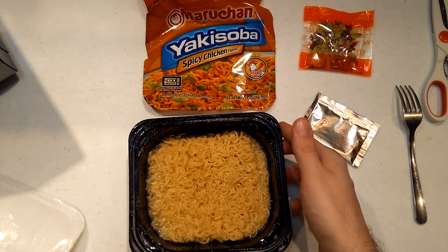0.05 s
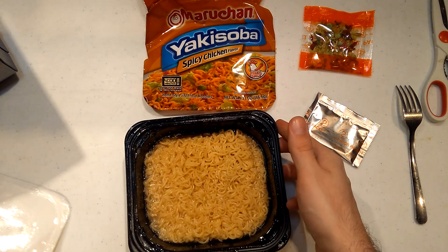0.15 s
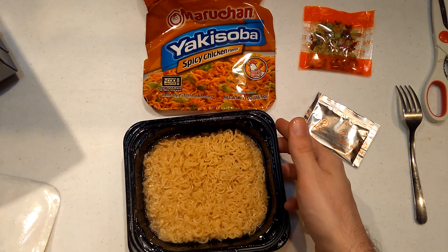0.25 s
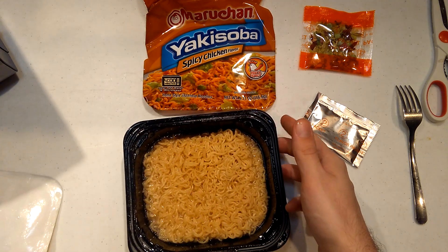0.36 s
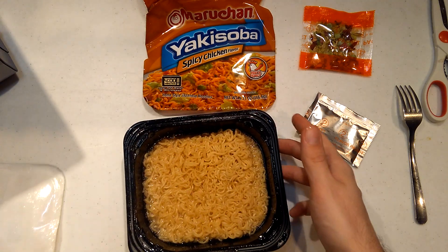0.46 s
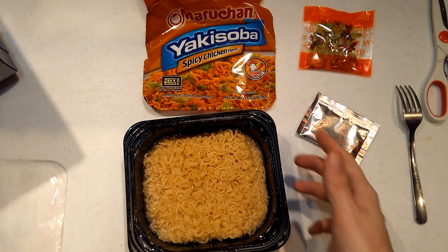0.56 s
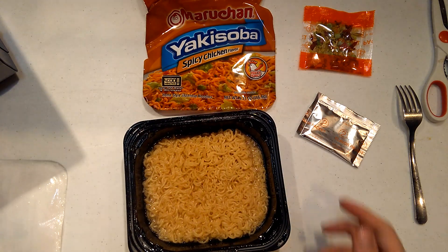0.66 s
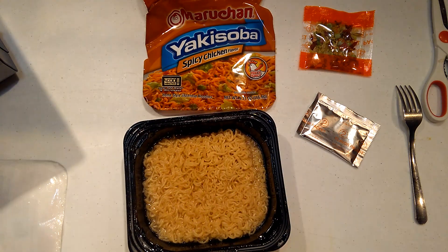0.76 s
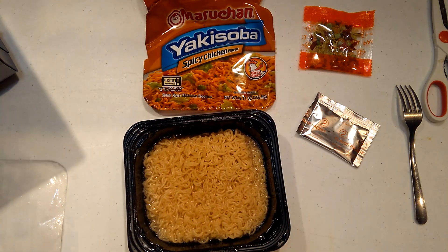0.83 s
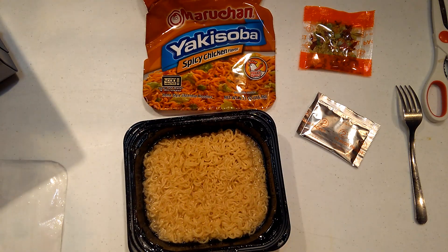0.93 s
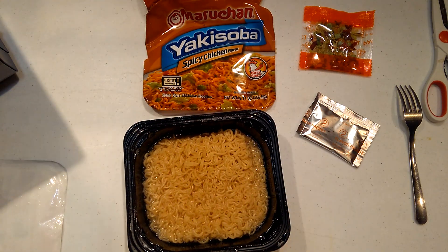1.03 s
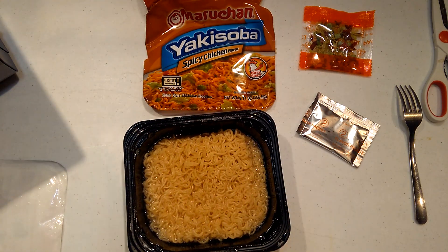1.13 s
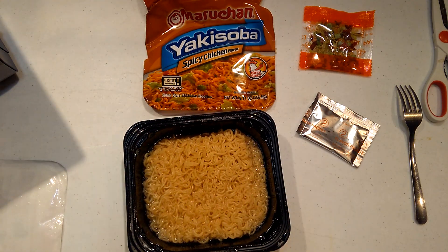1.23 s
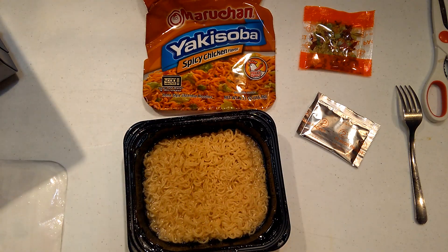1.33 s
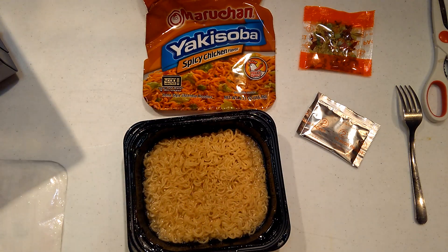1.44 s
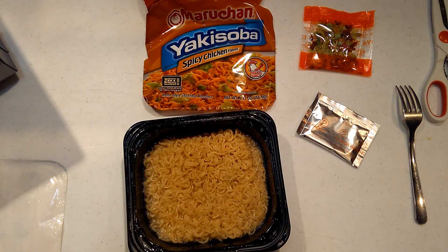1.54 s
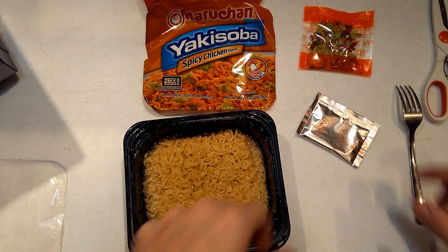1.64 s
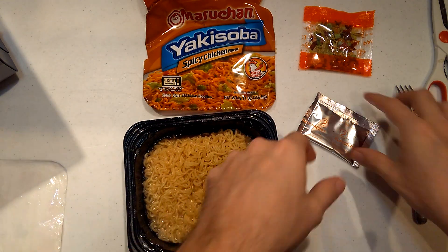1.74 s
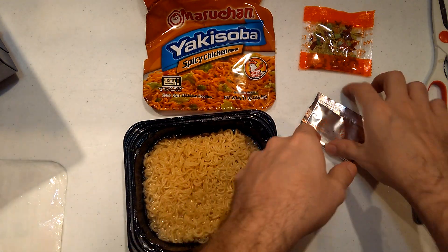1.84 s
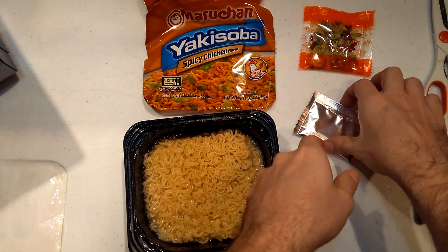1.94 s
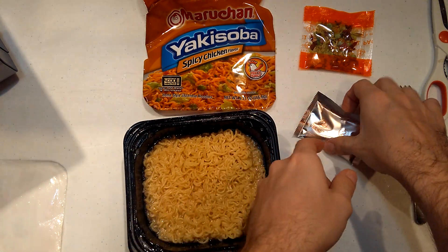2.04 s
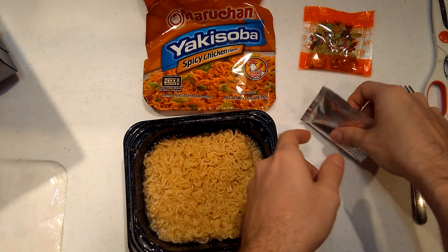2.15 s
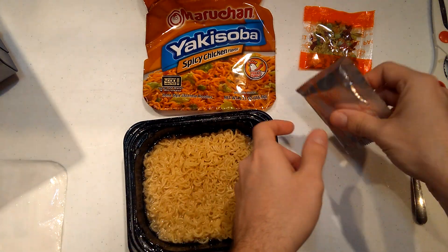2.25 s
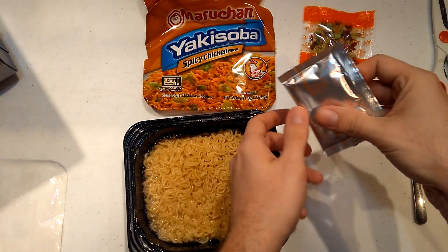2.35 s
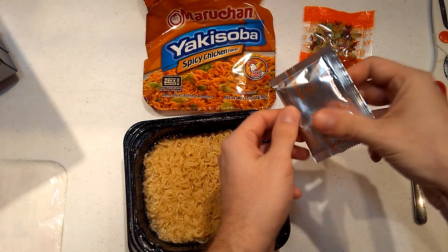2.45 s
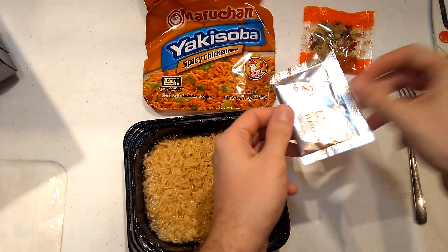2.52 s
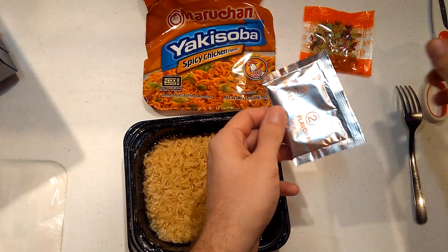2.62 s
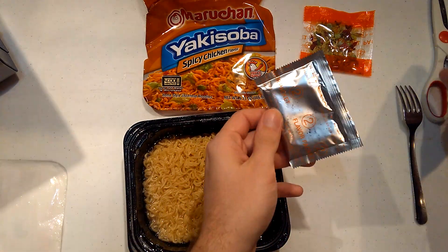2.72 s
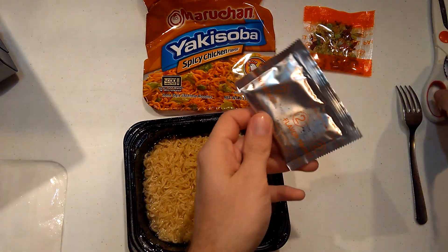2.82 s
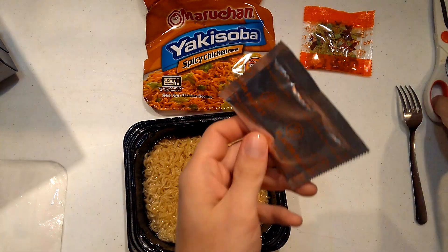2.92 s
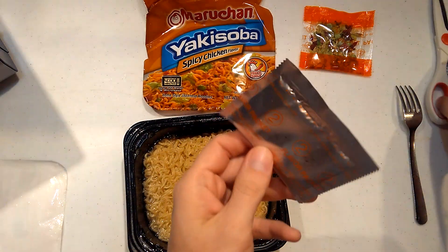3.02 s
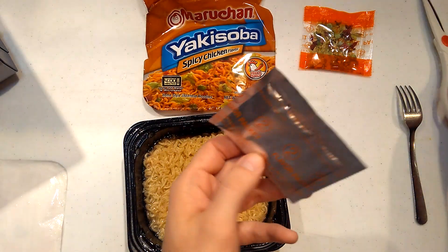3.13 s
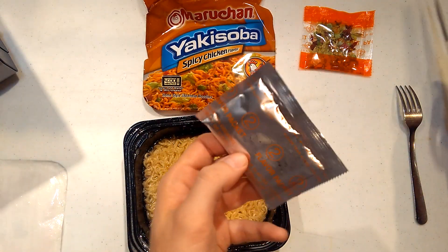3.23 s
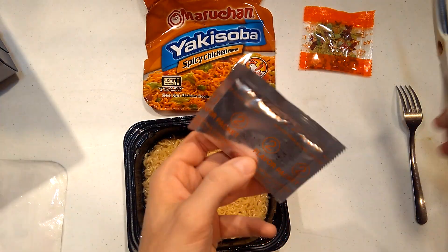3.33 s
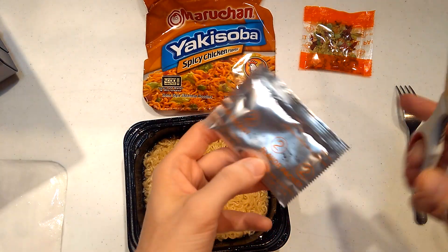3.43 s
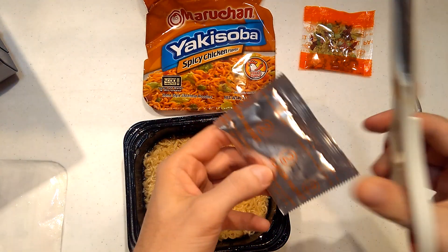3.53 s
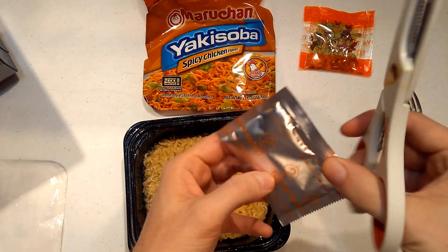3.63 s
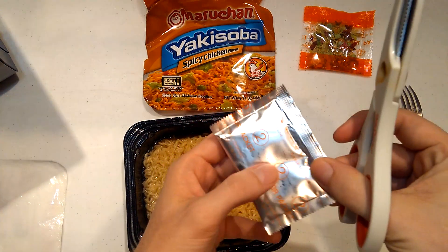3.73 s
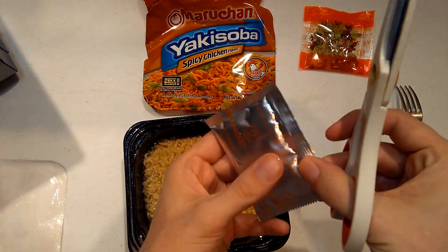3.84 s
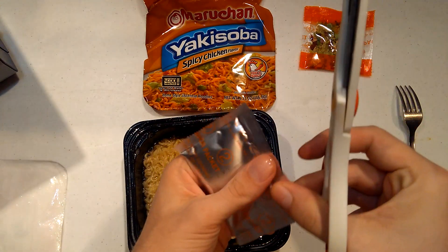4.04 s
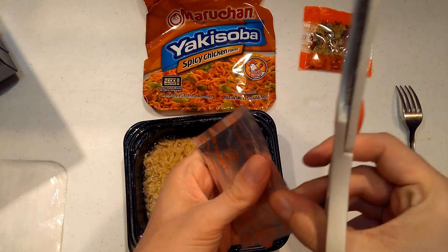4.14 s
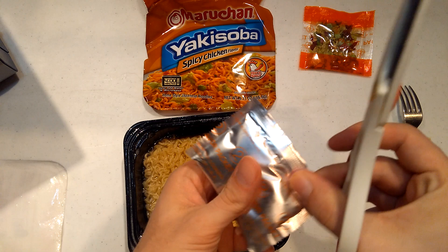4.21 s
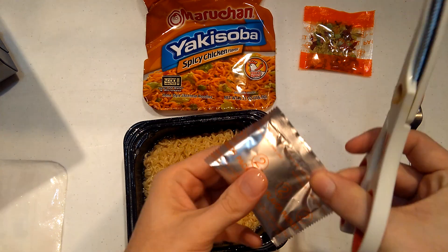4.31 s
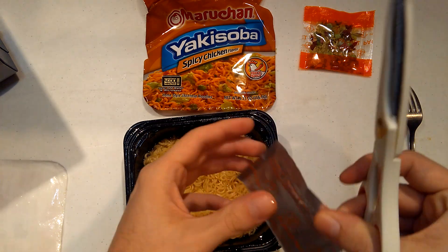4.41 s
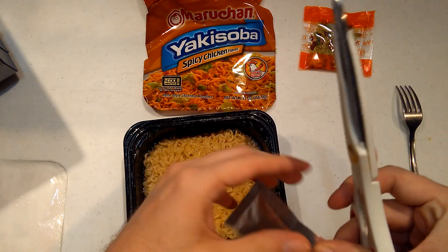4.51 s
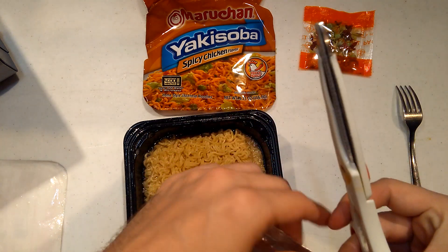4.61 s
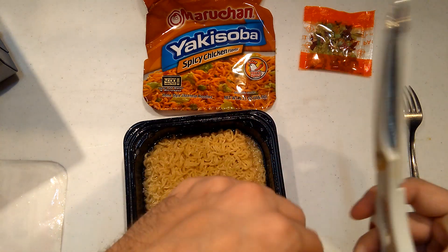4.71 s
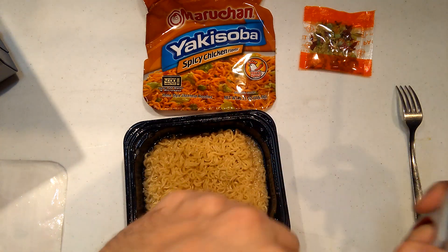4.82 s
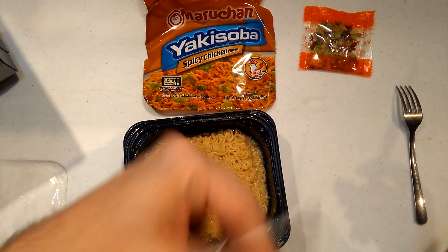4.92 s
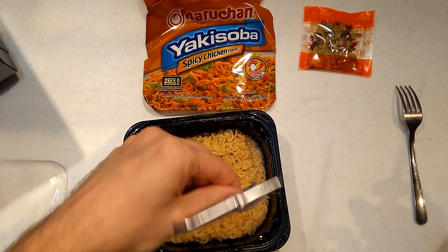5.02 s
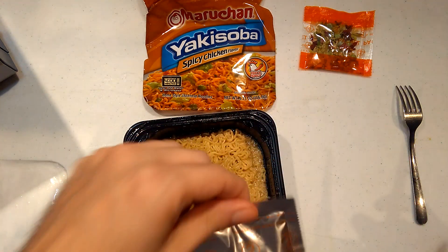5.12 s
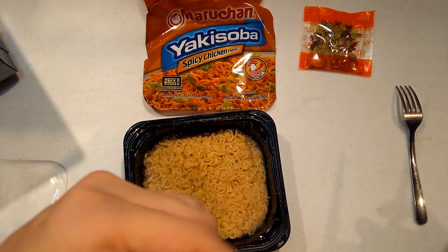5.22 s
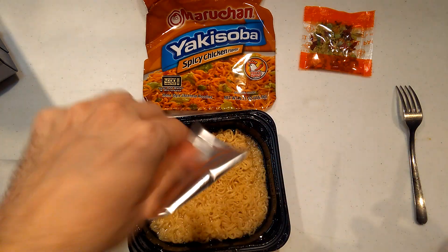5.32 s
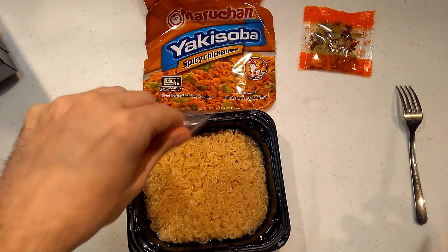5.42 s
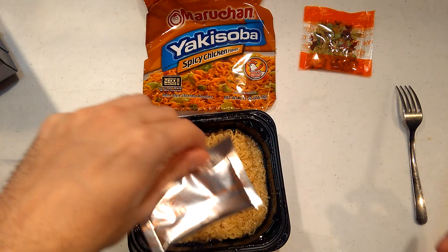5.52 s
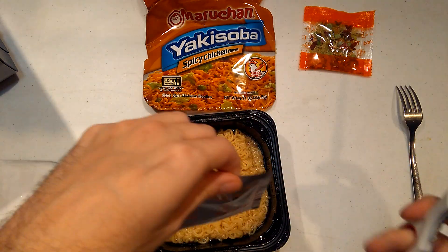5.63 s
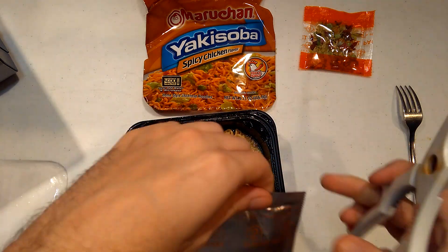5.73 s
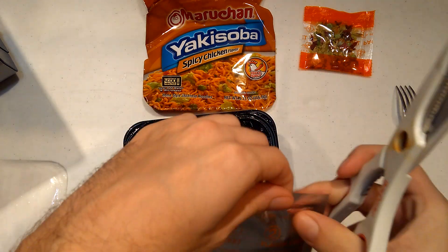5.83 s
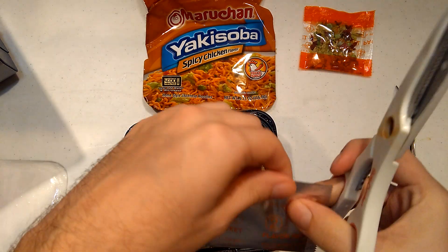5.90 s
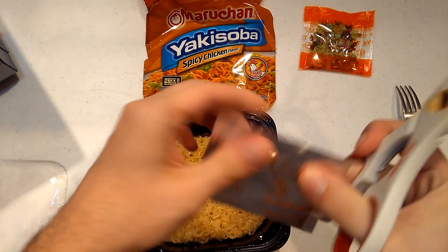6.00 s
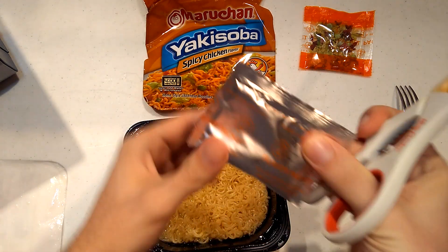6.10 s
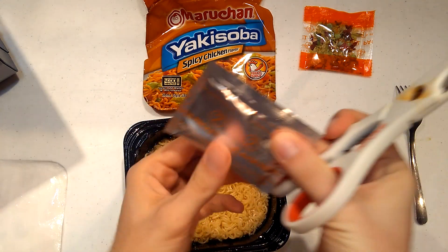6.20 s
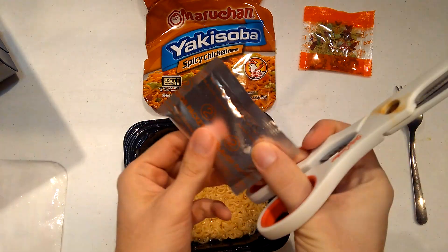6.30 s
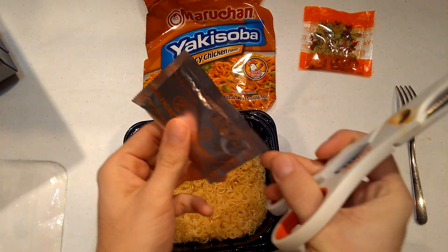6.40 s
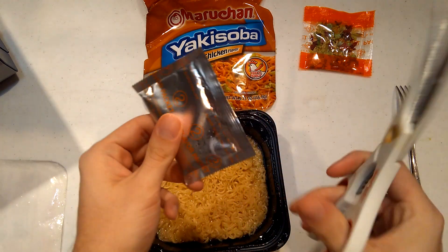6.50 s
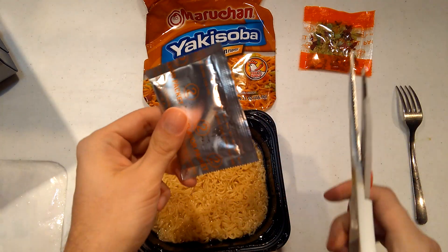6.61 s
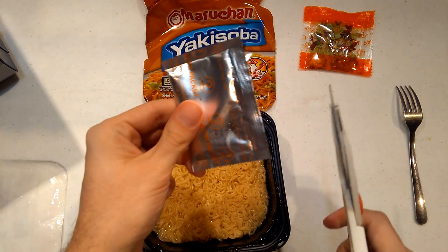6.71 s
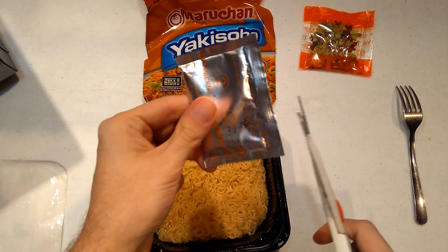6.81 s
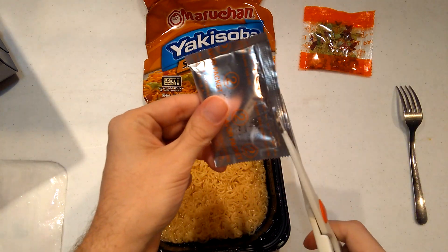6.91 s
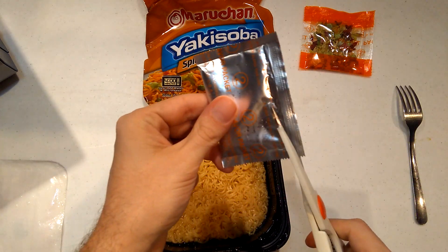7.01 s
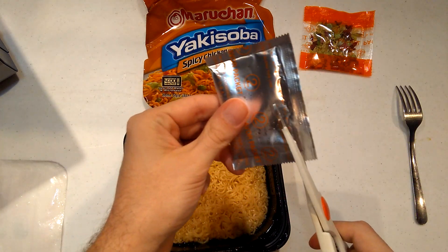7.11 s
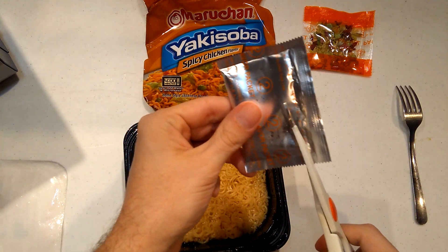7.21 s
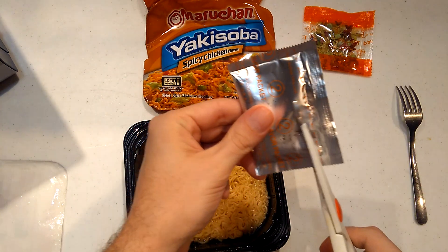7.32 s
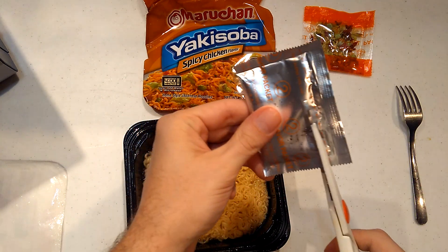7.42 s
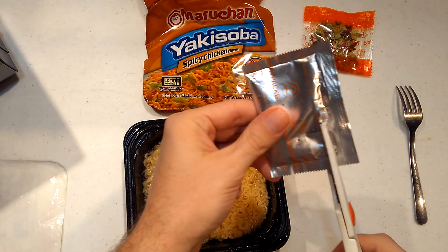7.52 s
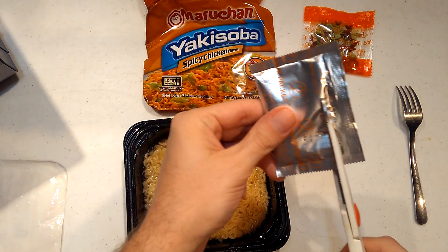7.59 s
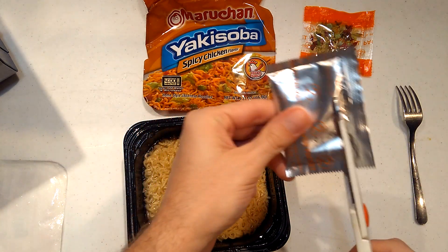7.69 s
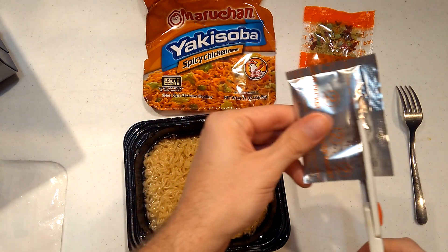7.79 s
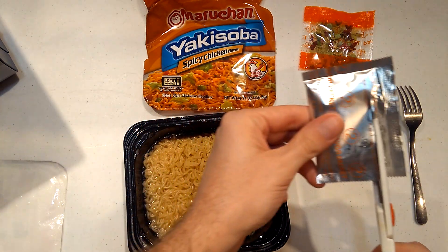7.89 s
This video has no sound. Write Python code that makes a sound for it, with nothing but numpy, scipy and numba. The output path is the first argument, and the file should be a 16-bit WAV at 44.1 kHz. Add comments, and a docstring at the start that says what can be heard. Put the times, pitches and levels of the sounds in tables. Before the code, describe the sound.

In a quiet kitchen, a plastic tray slides briefly on the counter. Knuckles knock and drag across the surface as a small foil sachet is picked up, and a softer knock and scrape follow. The foil crinkles with sharp little snaps, then is shaken several times, the powder slapping inside with soft thumps. Lighter crinkling continues to the end, close to a stereo microphone over a steady low rumble and hiss.

```python
"""At a kitchen counter, hands work a small foil sachet of powder close to a stereo microphone.
Creases snap one by one, squeezes and shakes pour out crackle, and the air in the pouch thumps.
A tray slides briefly at the start, and later knuckles knock and drag on the counter. All of these
are built from rings: short tones that die away. The quiet kitchen rumbles and hisses underneath."""
import sys
import numpy as np
from scipy import signal
from scipy.fft import rfft, irfft
from scipy.io import wavfile
from numba import njit

SR = 44100
rng = np.random.default_rng(int(sys.argv[2]) if len(sys.argv) > 2 else 0)


def inscribe(sig):
    """Save sig as 16-bit PCM at rate SR to the path in sys.argv[1].

    A 1-D sig is mono; a 2-D sig holds one channel per row.
    Samples are clipped to [-1, 1] before scaling.
    """
    pcm = np.round(np.clip(np.atleast_2d(sig).T, -1, 1) * 32767)
    wavfile.write(sys.argv[1], SR, pcm.astype(np.int16))


N = 350595

# Foil creases flipping, and the hollow click of two counter knocks (time [s], level [dB], pitch [Hz])
SHARP_SNAPS = [(0.186, -42.5, 1734), (1.8672, -40, 1302), (1.8775, -28.5, 4020), (1.9162, -41, 1203),
               (1.98, -30.5, 4780), (2.0147, -34, 4680), (2.1051, -30, 4900), (2.1231, -33, 3830),
               (2.1517, -32.5, 4840), (2.161, -44, 5060), (2.1746, -33, 4630), (2.354, -36, 3660),
               (2.494, -41, 4145), (3.596, -43, 1007), (3.6923, -42, 5650), (3.707, -39, 3880),
               (3.7415, -25, 3520), (3.7845, -37, 3700), (3.8183, -36, 1160), (3.85, -39, 1430),
               (3.8671, -27, 1250), (3.9634, -35.5, 2420), (4.0185, -40, 2180), (4.0295, -25, 2190),
               (4.052, -32.5, 2130), (4.078, -36, 4870), (4.1126, -30.5, 2390), (4.1844, -22.5, 7700),
               (4.227, -21.5, 1267), (4.2661, -22, 5090), (4.2856, -34.5, 3770), (4.3163, -31, 4650),
               (4.33, -33, 3580), (4.3597, -32.5, 3630), (4.4114, -31, 5270), (4.659, -29.5, 1853),
               (4.68, -36.5, 3750), (4.729, -38, 1000), (4.746, -35, 3470), (4.8046, -41.5, 4750),
               (4.828, -41, 1800), (4.839, -38, 1510), (4.8529, -20.5, 2230), (4.9032, -33, 3887),
               (4.9182, -17.5, 1500), (4.9255, -18.5, 2080), (4.931, -16, 2200), (5.016, -39, 3580),
               (5.039, -32, 2630), (5.0545, -31, 2210), (5.0767, -26, 2865), (5.0842, -26, 2650),
               (5.096, -26, 4400), (5.123, -26.5, 1570), (5.146, -19, 2020), (5.16, -20.5, 1250),
               (5.178, -34, 2170), (5.2293, -35, 2520), (5.2493, -27.5, 2536), (5.268, -20, 1810),
               (5.273, -14, 2537), (5.281, -20.5, 2724), (5.2997, -18.5, 4220), (5.3149, -28.5, 2270),
               (5.362, -22.5, 1904), (5.383, -25, 2680), (5.3959, -19, 3000), (5.4033, -23, 2137),
               (5.445, -31, 1942), (5.457, -33, 3984), (5.4981, -21.5, 2060), (5.5022, -17, 1350),
               (5.5783, -29, 2835), (5.5891, -32, 1330), (5.6145, -25, 1790), (5.629, -38, 2733),
               (5.752, -34.5, 4634), (5.8737, -41.5, 2540), (5.8824, -31, 4900), (5.899, -37, 5310),
               (5.936, -39.5, 1030), (5.943, -26.5, 1200), (6.018, -46, 1125), (6.2642, -26.5, 4160),
               (6.286, -37.5, 1090), (6.3841, -35.5, 1410), (6.414, -31, 3500), (6.5613, -48, 5390),
               (7.47, -46.5, 1100), (7.5174, -44, 8200), (7.564, -34.5, 1284), (7.569, -34, 1160),
               (7.5998, -39.5, 4400), (7.709, -33, 4190), (7.7395, -33.5, 4440), (7.7614, -29, 4830),
               (7.7746, -35.5, 4130), (7.8243, -27.5, 4100), (7.8747, -30.5, 4700), (7.9014, -27.5, 4810)]
def snaps(count=30):
    """A crease flips or a knock clicks: many very short rings at once, loudest near one pitch."""
    s, db, pitch = np.transpose(SHARP_SNAPS)[:, :, None]
    low_db = -14.5 - 5 * np.log2(pitch / 2400)  # higher snaps have less bass
    spot, flip, delay, side = rng.random((len(s), 4, count)).swapaxes(0, 1)
    hz = 350 * (15500 / 350) ** ((np.arange(count) + spot) / count)
    pitch_db = 14.5 * np.exp(-(np.log(hz / pitch) / .19) ** 2)
    size = undb(db + foil_db(hz, low_db, high_db=-4.5) + pitch_db - 8) * np.sign(flip - .5)
    fade = .003 + 5 / hz + 2000 / hz ** 2
    when = s - .0003 + .0028 * delay ** 3  # most rings start at once, the rest just after
    pan_db = 20 * np.minimum(hz / 3000, 1) * (side - .5)
    return strike(when, hz, fade, size, pan_db, lag_samples=(1, 9))


# Squeezes and shakes (peak time [s], level [dB], rise [s], fall [s], bass [dB], treble [dB])
SQUEEZES = [(.03, -54, 0.11, 0.28, -3.5, -15.5), (.184, -45.5, 0.025, 0.057, -11.5, -29),
            (.422, -55, .04, .05, -27, -20), (.505, -54.5, 0.037, .06, -11, -12),
            (1.214, -46, .006, 0.058, -17, -56), (1.935, -41.5, .03, 0.062, 8, -21),
            (2.015, -48, 0.054, 0.035, -22, -4), (2.124, -46, 0.077, .1, -14.5, -6.5),
            (3.408, -54.5, 0.02, .055, -35, 3), (3.6, -54, 0.013, 0.065, -3.5, -19),
            (3.73, -56.5, 0.14, 0.29, -11, -11), (3.866, -37, 0.0054, 0.029, -23, -25),
            (3.961, -52.5, 0.0045, 0.07, -37, -5), (4.026, -42, 0.014, 0.064, -19, -10),
            (4.18, -40.5, .01, 0.12, -13, -8), (4.27, -51.5, 0.14, .06, -19, 0),
            (4.314, -46, 0.0047, .125, -9, -5), (4.659, -44, 0.011, 0.15, -17, -10),
            (4.858, -40, 0.024, 0.019, -36, -4), (4.923, -21, 0.03, 0.045, -23.5, -8.5),
            (5.16, -32, 0.14, 0.052, -21, -7.5), (5.276, -24.5, 0.032, 0.067, -29, -9.5),
            (5.385, -21.5, 0.04, 0.04, -17, -11.5), (5.506, -28, 0.064, 0.037, -20, -12.5),
            (5.616, -33.5, 0.055, .038, -31, -18.5), (5.75, -42, 0.015, .026, -24, -22),
            (5.88, -48.5, 0.027, 0.063, -11, 0), (5.96, -63, 0.059, .15, -6, -9),
            (6.27, -51, 0.037, 0.04, -8.5, -1), (6.39, -50.5, 0.13, 0.062, -9.5, -10),
            (6.55, -60, 0.13, .06, -17, 4.5), (7.482, -56.5, 0.047, 0.016, -10, -1.5),
            (7.522, -52, 0.0065, .06, -9, 2.5), (7.57, -44.5, 0.045, 0.023, -12, -2.5),
            (7.71, -49.5, 0.045, 0.073, -9.5, -5), (7.762, -52, 0.044, 0.053, -16, -7),
            (7.822, -45.5, 0.024, 0.16, -6.5, -4.5), (7.905, -47, 0.19, .05, -30, -9.5)]
def crackle(count=16000, each=5):
    """Countless tiny creases and powder grains each set off a few rings, mostly faint ones."""
    s = rng.random(count) * N / SR
    db, low_db, high_db = loudest_burst(SQUEEZES, s)[:, :, None]
    spot, strength, flip, delay = rng.random((count, 4, each)).swapaxes(0, 1)
    hz = 280 * (15500 / 280) ** ((np.arange(each) + spot) / each)
    chance_db = 2.07 * rng.exponential(size=(count, 1)) + 10.7 * (strength - .5)
    size = undb(db + foil_db(hz, low_db, high_db) + chance_db - 5.5) * np.sign(flip - .5)
    fade = .003 + 5 / hz + 7000 / hz ** 2  # the air in the pouch booms longer
    heard = db[:, 0] > -150
    when = s[:, None] + .0008 * delay
    # creases lie all over the foil, and the treble beams left or right
    pan_db = 12.6 * np.minimum(hz / 3000, 1) * rng.standard_normal((count, each))
    return strike(*(a[heard] for a in (when, hz, fade, size, pan_db)), lag_samples=(1, 9))


# Powder slaps the pouch, or a finger taps it (time [s], level [dB], pitch [Hz])
POUCH_THUMPS = [(1.2155, -39.5, 1784), (4.228, -53, 483), (4.729, -33, 501), (4.93, -30.5, 440),
                (5.16, -30.5, 440.8), (5.27, -20.5, 444), (5.398, -39, 501.6), (5.5, -25, 429.4),
                (5.58, -33, 410), (5.616, -32.5, 398.6), (5.765, -44, 510), (5.938, -41, 450),
                (6.265, -38.5, 400), (6.416, -36, 304), (7.524, -39, 487), (7.572, -39, 400),
                (7.718, -40.5, 924), (7.777, -44, 605)]
def thumps(count=8):
    """The air in the pouch booms: a handful of low rings that die quickly."""
    s, db, pitch = np.transpose(POUCH_THUMPS)[:, :, None]
    detune, delay, flip = rng.standard_normal((len(s), 3, count)).swapaxes(0, 1)
    hz = pitch * np.exp(.3 * detune)
    fade = .03 * np.sqrt(pitch / hz)
    size = undb(db) * np.sign(flip) / np.sqrt(count)
    return strike(s + .00205 * np.abs(delay), hz, fade, size)


# The counter's natural tones (pitch [Hz], level [dB], fade time [s])
COUNTER_TONES = [(62.4, -26, 0.13), (108, -15, 0.11), (127, 3, 0.13), (183.5, -1.5, 0.25), (227, -3, 0.18),
                 (385, -4, 0.091), (663, -4, 0.043), (800, -30, 0.041), (1083, -5, 0.062),
                 (1323, -18, 0.054), (1610, -38, 0.016), (2060, -21, 0.029)]
# Knuckles hitting the counter (time [s], level [dB])
KNUCKLE_KNOCKS = [(1.867, -18), (1.913, -22.5), (2.922, -37.5), (2.941, -31), (2.963, -40)]
def knocks():
    """A knock rings all the counter's tones at once."""
    s, db = np.transpose(KNUCKLE_KNOCKS)[:, :, None]
    hz, tone_db, fade = np.transpose(COUNTER_TONES)
    chance_db = 1.93 * rng.standard_normal((len(s), len(hz)))
    return strike(s, hz, fade, -undb(db + tone_db - 6 + chance_db), lag_samples=(1, 3))


# A tray, later knuckles, dragging over the counter
# (peak time [s], level [dB], rise [s], fall [s], rub [dB], rub pitch [Hz])
COUNTER_DRAGS = [(.08, -39, 0.11, .2, -7, 1087), (.15, -44.5, .08, 0.38, -20, 1028),
                 (1.885, -18, .015, 0.098, -8, 694), (1.93, -20, 0.025, 0.051, 8.5, 639),
                 (2.0, -37, 0.11, 0.5, 7, 596), (2.146, -43.5, 0.16, .115, -7, 980),
                 (2.93, -23.5, 0.021, 0.074, -2, 900), (3.035, -36, 0.019, 0.093, 6, 1040),
                 (3.105, -31.5, 0.14, .06, 5, 1060)]
def drags(count=24000):
    """A drag is a run of tiny slips, each ringing one of the counter's tones."""
    s = rng.random(count) * N / SR
    db, rub_db, rub_hz = loudest_burst(COUNTER_DRAGS, s)
    pitch, tone_db, fade = np.array(COUNTER_TONES)[rng.integers(len(COUNTER_TONES), size=count)].T
    detune, strength = rng.standard_normal((count, 2)).T
    hz = pitch * np.exp(.024 * detune)
    # the sliding weight drives the low tones, the rubbing those near its own pitch
    weight = undb(.5 * tone_db) * (hz < 450)
    rub = undb(rub_db - 19.5 * np.abs(np.log(hz / rub_hz))) * (hz > 300)
    size = undb(db - 13) * (weight + rub) * strength
    heard = db > -150
    return strike(*(a[heard] for a in (s, hz, .31 * fade, size)))


# The tray's hollow tones (pitch [Hz], level [dB], fade time [s])
TRAY_TONES = [(802, -11, 0.032), (1076, 0, 0.06), (2633, -0.5, 0.02), (4120, -6.5, 0.026),
              (5430, -6.5, 0.028)]
def tray(count=500, stop_s=.16, fall_db_per_s=430):
    """A plastic tray slides to a stop: quick slips, each ringing one of its tones."""
    s = rng.random(count) * .21
    hz, tone_db, fade = np.array(TRAY_TONES)[rng.integers(len(TRAY_TONES), size=count)].T
    strength, detune = rng.standard_normal((count, 2)).T
    size = undb(tone_db - 59 - fall_db_per_s * np.maximum(s - stop_s, 0)) * strength
    return strike(s, hz * np.exp(.07 * detune), fade, size)


# The kitchen's steady noise (pitch [Hz], level [dB])
KITCHEN_NOISE = [(15, -51), (25, -4.5), (53, -1.5), (80, -7.5), (117, -6.5), (195, -16), (263, -11.5),
                 (285, -18.5), (317, -15.5), (439, -22.5), (545, -23), (796, -26), (1520, -26),
                 (14400, -49), (16000, -49)]
# How alike it is left and right (pitch [Hz], likeness [0-1])
KITCHEN_LIKENESS = [(60, 0.87), (130, 0.61), (290, 0.66), (640, 0), (1400, 0)]
def kitchen(shared_db=-52.5):
    """Steady rumble and hiss, alike on both sides only in the bass."""
    hz = np.fft.rfftfreq(N, 1 / SR)
    alike = at_pitch(hz, KITCHEN_LIKENESS)
    shared, side = rfft(rng.standard_normal((2, N))) * undb(at_pitch(hz, KITCHEN_NOISE))
    shared, side = shared * np.sqrt(1 + alike), side * np.sqrt(1 - alike)
    gain = undb(shared_db) / np.std(irfft(shared, N))
    return irfft(np.array([shared + side, shared - side]), N) * gain


def room(x, fade_s=.12, echo_db=-10):
    """Cupboards and walls send back a short wash of echoes, different on each side."""
    t = np.arange(int(.3 * SR)) / SR
    tail = rng.standard_normal((2, len(t))) * undb(-60 * t / fade_s) * (t > .003)
    tail = signal.lfilter([1], [1, -.4], tail)  # soften the treble
    tail = signal.lfilter([1, -1], [1, -.96], tail)  # thin the bass
    tail *= undb(echo_db) / np.sqrt(np.sum(tail ** 2, axis=1, keepdims=True))
    return x + signal.fftconvolve(x.mean(0)[None], tail, axes=1)[:, :N]


def undb(db):
    """Turn decibels into a gain."""
    return 10 ** (np.asarray(db) / 20)


def at_pitch(hz, table):
    """Look up a value by pitch, gliding between the table's rows."""
    f, v = np.transpose(table)
    return np.interp(np.log(np.maximum(hz, 1)), np.log(f), v)


def loudest_burst(bursts, s):
    """Level and extra columns of the burst that is loudest at each time s."""
    peak_s, db, rise, fall, *columns = np.transpose(bursts)[:, :, None]
    late = s - peak_s
    drop_db = 20 * np.maximum(late / fall, -late / rise) ** 1.4  # a rounded peak
    db = np.where(drop_db < 30, db - drop_db, -200)
    return np.array([db.max(0)] + [c[db.argmax(0), 0] for c in columns])


def foil_db(hz, low_db, high_db):
    """How loud the foil rings at each pitch, next to its middle range."""
    low, mid, high = np.log((800, 2400, 9000))  # Hz
    u = np.log(hz)
    bass = np.clip((mid - u) / (mid - low), 0, 1) * low_db
    treble = np.clip((u - mid) / (high - mid), 0, 1.6) * high_db
    return bass + treble - 22 * np.maximum(u - high, 0) - 6.8 * np.maximum(low - u, 0)


@njit
def rings(n, start, hz, fade, left, right, lag, sr):
    """Add up tones that each drop 60 dB in their fade time."""
    out = np.zeros((2, n + 64))
    for k in range(len(start)):
        step = np.exp(2j * np.pi * hz[k] / sr - np.log(1000) / (fade[k] * sr))
        z = 1 + 0j
        for i in range(start[k], min(n, start[k] + int(fade[k] * sr))):
            z *= step
            out[0, i + lag[k]] += left[k] * z.imag
            out[1, i] += right[k] * z.imag
    return out[:, :n]


# How much quieter the left side is (pitch [Hz], drop [dB])
LEFT_DULLING = [(1300, 0), (4400, 2), (9000, 4.5)]
def strike(s, hz, fade, size, pan_db=0, lag_samples=(1, 5)):
    """Place rings in time and from left to right; the left hears them later and duller."""
    s, hz, fade, size, pan_db = (a.flatten() for a in np.broadcast_arrays(s, hz, fade, size, pan_db))
    pan = pan_db - at_pitch(hz, LEFT_DULLING)
    start = np.clip((s * SR).astype(np.int64), 0, N - 1)
    lag = rng.integers(*lag_samples, len(s))
    return rings(N, start, hz, fade, size * undb(pan / 2), size * undb(-pan / 2), lag, float(SR))


def scene():
    """Sachet, counter and tray in the room, over the kitchen's own noise."""
    bass_cut = signal.butter(4, 234, "high", fs=SR, output="sos")  # so small a sheet gives no bass
    sachet = signal.sosfilt(bass_cut, snaps() + crackle() + thumps())
    return room(sachet + knocks() + drags() + tray()) + kitchen()


def record(dry):
    """The microphone drops the deepest bass, and the highest treble is cut steeply."""
    dry = signal.sosfilt(signal.butter(8, 37.5, "high", fs=SR, output="sos"), dry)
    return signal.sosfilt(signal.ellip(10, .2, 80, 16100, fs=SR, output="sos"), dry)


dry = scene()
out = record(dry)
inscribe(out)
```